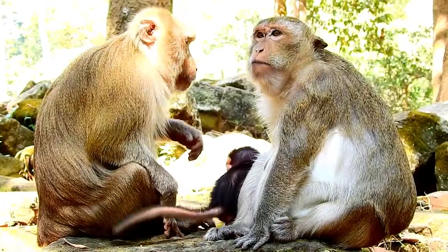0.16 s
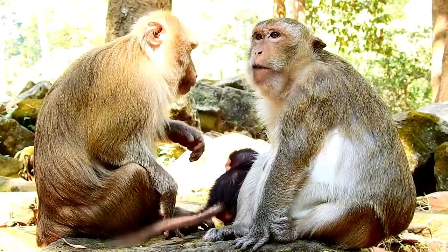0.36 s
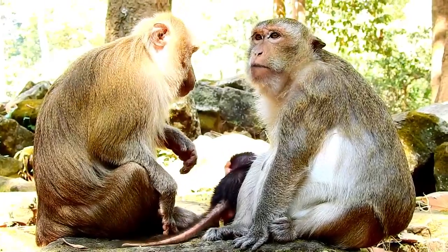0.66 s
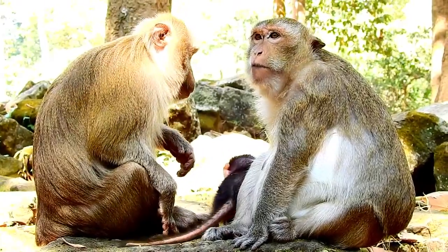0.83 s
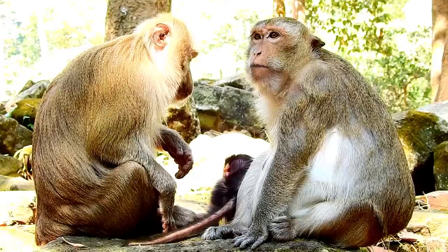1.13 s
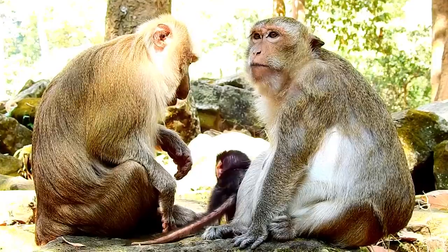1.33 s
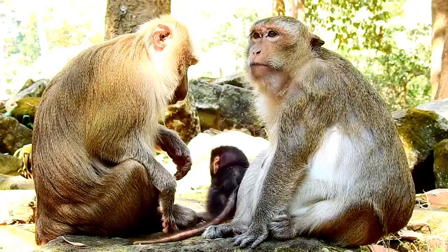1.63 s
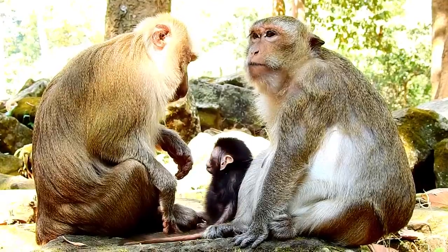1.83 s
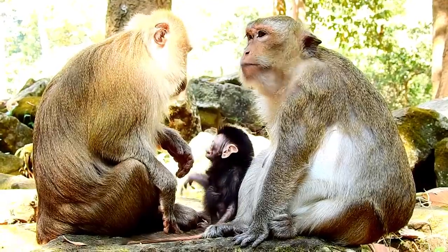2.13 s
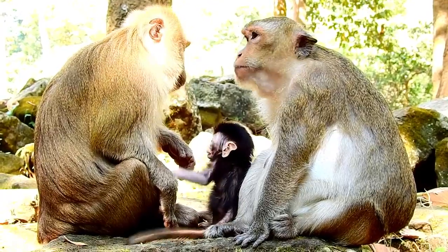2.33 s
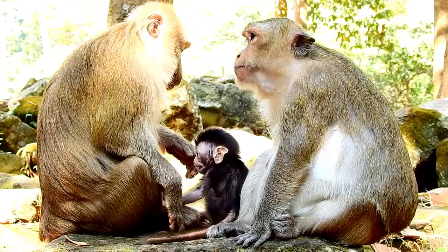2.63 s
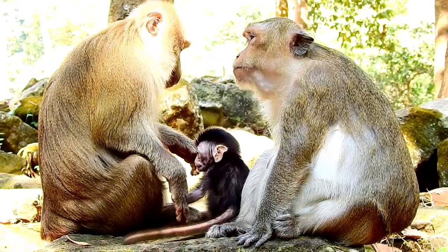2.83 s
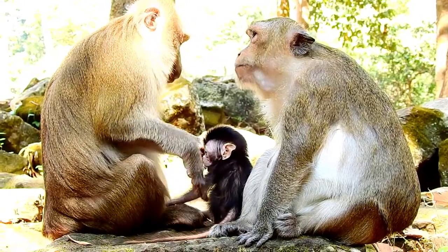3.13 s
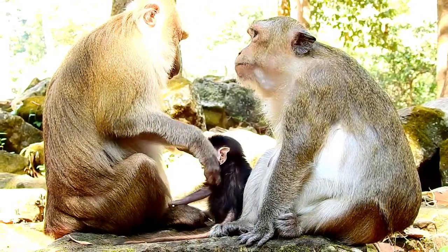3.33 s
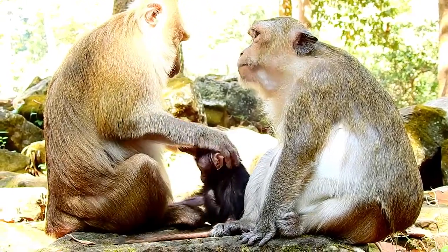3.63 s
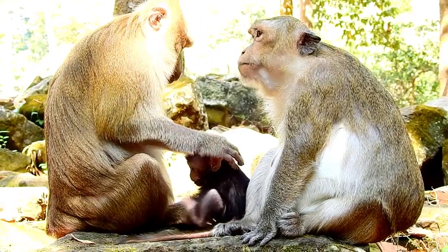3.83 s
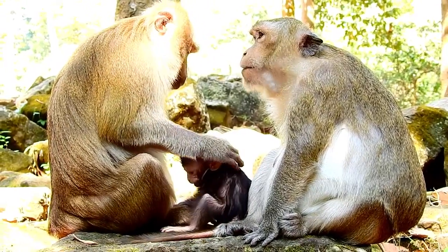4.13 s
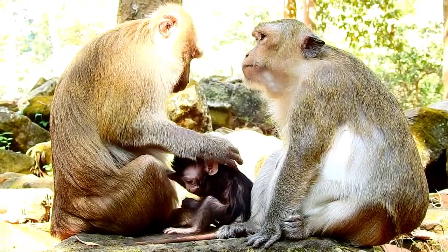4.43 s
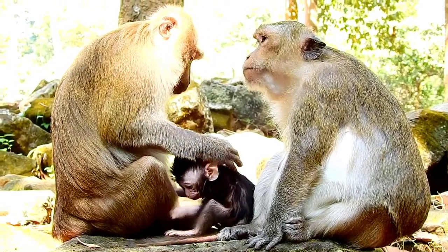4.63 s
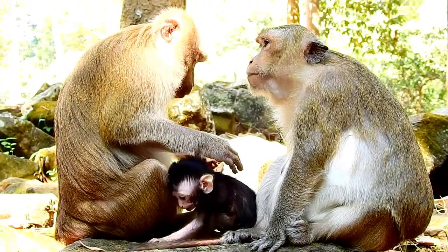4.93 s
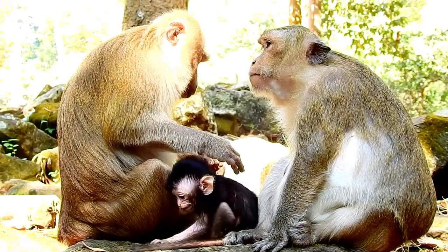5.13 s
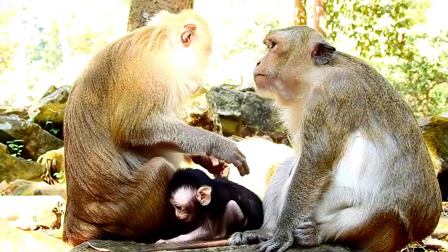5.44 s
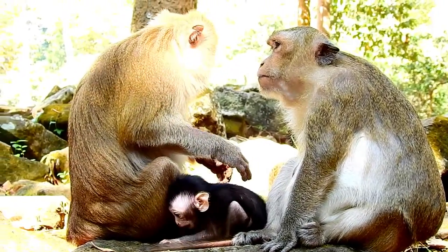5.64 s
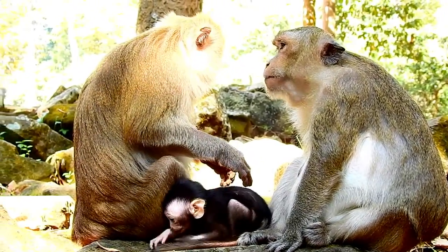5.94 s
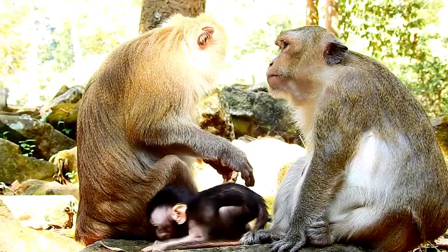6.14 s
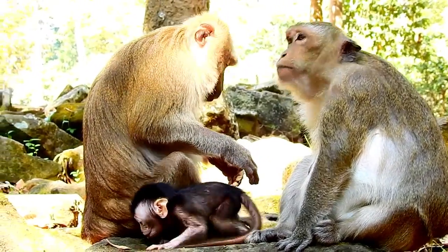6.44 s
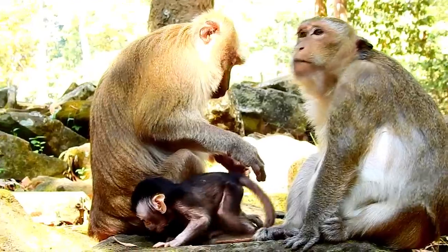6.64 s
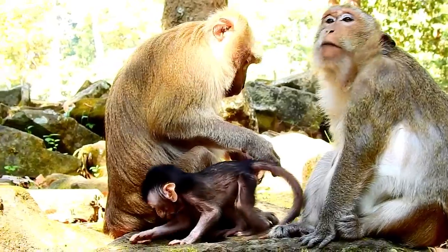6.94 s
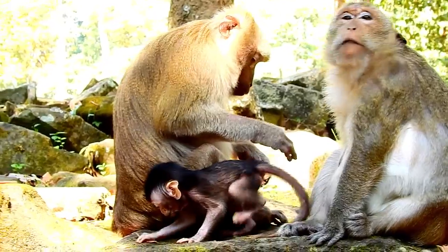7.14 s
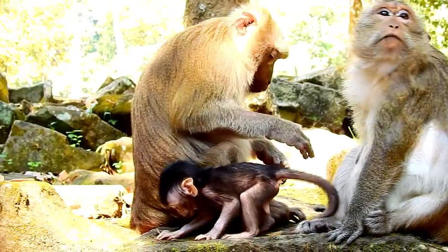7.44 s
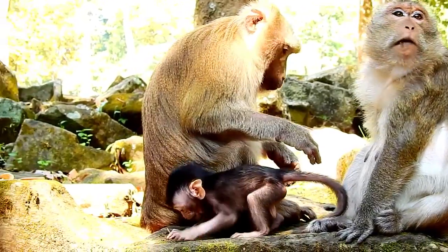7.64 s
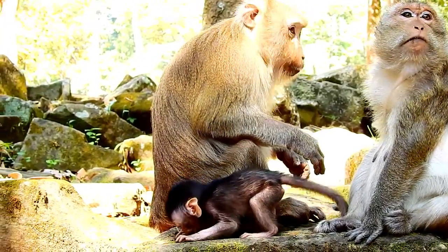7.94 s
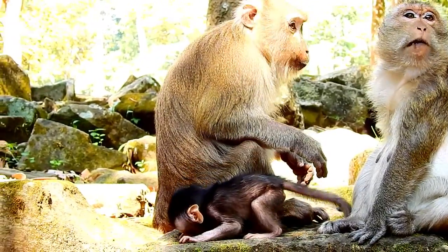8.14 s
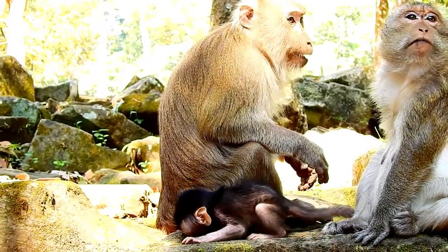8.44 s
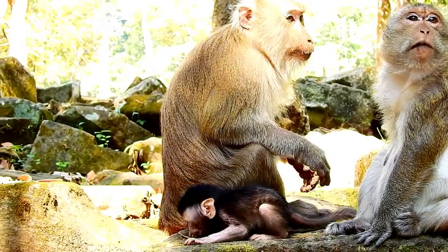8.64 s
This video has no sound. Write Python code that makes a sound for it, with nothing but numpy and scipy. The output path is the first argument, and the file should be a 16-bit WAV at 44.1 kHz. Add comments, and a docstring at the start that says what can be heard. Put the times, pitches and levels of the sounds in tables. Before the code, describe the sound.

In a stony woodland clearing, a far squeal's tail and a leaf stir open over a low drone. A baby monkey squeals clearly nearby, repeating after quiet gaps, while distant animals faintly coo, chirp and whistle. Midway it is calm; then dry leaves scuffle and twigs crack sharply around another squeal. A faint rasp, a distant hoarse cry and a last close squeal over rustling leaves end it. Stereo, with short natural echoes and a presence-heavy small microphone.

```python
"""Among rocks and trees, monkeys call: an infant squeals close by, others squeal, coo and whistle further off.
Voices are stacked harmonics, shaped by throat and mouth, roughened by unsteady pitch and fluttering breath.
Dry leaves rustle as clumped grains, twigs and stone snap and knock as noise bursts, a pulsed noise rasps hoarsely.
Rocks and trunks ring on as decaying scatter; shaped noise makes a far low hum and faint leaf and insect hiss."""
import sys
import numpy as np
from scipy import signal
from scipy.fft import rfft, irfft
from scipy.io import wavfile
from scipy.ndimage import uniform_filter1d

SR = 44100
rng = np.random.default_rng(int(sys.argv[2]) if len(sys.argv) > 2 else 0)


def int16_out(signal):
    """Quantize to a 16-bit WAV file."""
    q = np.round(np.clip(np.atleast_2d(signal).T, -1, 1) * 32767)
    wavfile.write(sys.argv[1], SR, q.astype(np.int16))


N = 386842   # length in samples

# Microphone response: f/Hz, gain/dB
MICROPHONE_RESPONSE = [(28, -4), (60, 0.7), (3600, 0.5), (4000, -3), (4400, 1), (5000, 3), (6400, 6),
                       (8500, -9), (9600, -19.5), (12500, -30.5), (15500, -55)]
CUTOFF_HZ = 15700
# Colour of the far hiss: f/Hz, gain/dB
AIR_COLOUR = [(25, -75.5), (48, -51), (108, 3.5), (170, -13), (253, -19.5), (426, -17.5), (1240, -13),
              (3300, -19), (6400, -22.5), (8500, -18.5), (15500, -12.5)]
AIR_DB = -51.5   # mean of the gusts
# Left-right likeness of the hiss: f/Hz, likeness/1
AIR_LIKENESS = [(60, 1.0), (210, 0.93), (740, 0.951), (2590, 0.61), (9080, 0.067)]
# Bands of the drone: f/Hz, width of each of two resonances in a row/Hz, level in the mix of bands/dB
HUM_BANDS = [(58.6, 75.1, -2), (115.47, 16.8, 1), (161.4, 27.65, 0)]
# Rise and fall of the drone, ahead of an overall trim: t/s, level/dB
HUM_CONTOUR = [(0, -42.5), (.45, -45.5), (1.0, -53), (5.3, -53), (6.6, -49), (7.2, -53.5), (8.77, -52.5)]
# Ring time of the glade: f/Hz, time to fall 60 dB/s
GLADE_RING_TIME = [(500, 0.53), (2900, 0.67), (3400, 0.6425), (6000, 0.536), (12000, 0.2)]

# Colour of the crisp leaf layer: f/Hz, gain/dB
CRISP_COLOUR = [(1500, -48), (2500, -13.5), (4500, -5), (6500, -2.5), (7600, -3.5), (9000, -3.5),
                (15000, 7.5)]
# Colour of the dull leaf layer: f/Hz, gain/dB
DULL_COLOUR = [(200, -18), (500, -7), (900, 5), (1700, 6), (2500, 0), (5000, -79.5)]
# Single stirs in the leaves: t of the peak/s, crisp level/dB, dull level/dB
LEAF_STIRS = [(0.001, -28, -48), (.44, -77, -45), (.55, -38.5, -69), (1.699, -48.5, -83), (2.553, -39, -50),
              (2.778, -37.5, -58), (3.177, -39, -55), (3.702, -40, -65), (7.258, -41, -51),
              (7.6, -40, -52.5), (7.96, -32, -61)]
STIR_RISE_DB_PER_S, STIR_FALL_DB_PER_S = 70, 85
# Two longer scuffles, each a list of: t/s, crisp level/dB, dull level/dB
LEAF_SCUFFLES = [
    [(5.645, -42, -52), (5.67, -35, -55), (5.75, -37, -53), (5.95, -31, -47), (6.12, -25, -40.5),
     (6.25, -23, -41), (6.36, -31, -42), (6.5, -21, -44), (6.59, -25, -46.5), (6.65, -42, -66.5),
     (7.1, -67, -67)],
    [(8.04, -36, -77), (8.08, -33, -70), (8.45, -29, -51.5), (8.62, -31, -54.5), (8.68, -21, -41),
     (8.77, -25, -45)],
]
# Resonances of the rasp: f/Hz, width of the first of two in a row/Hz, level/dB
RASP_RESONANCES = [(1180, 260, -10), (1400, 300, 0), (1650, 280, -8), (2750, 320, -9)]
RASP_S, RASP_DB, RASP_ATTACK_S, RASP_HOLD_S, RASP_FALL_DB_PER_S = 7.45, -36.5, 0.033, 0.14, 96
RASP_PULSES_PER_S = 100   # on average
# Twigs and knocks: t/s, crack peak ahead of panning/dB, knock peak/dB, knock ring f/Hz
TWIG_SNAPS = [(0.3041, -45, -23.5, 521), (0.4116, -50, -24, 600), (1.013, -48, -39.5, 1640),
              (1.1048, -53, -41.5, 900), (1.6885, -34.5, -53, 1090), (2.446, -60, -46.5, 406),
              (2.5675, -45, -29, 1200), (3.1202, -34, -39.5, 1830), (3.1795, -29, -43, 910),
              (3.206, -34, -44, 1220), (3.2683, -35, -45, 1210), (3.342, -38, -43.5, 1670),
              (3.654, -56, -31, 4470), (5.657, -33, -49, 2030), (5.7791, -24.5, -39.5, 860),
              (5.8152, -27, -46, 1070), (5.8474, -30.5, -36.5, 1150), (5.885, -21.5, -32.5, 1510),
              (6.007, -23.5, -37, 1200), (6.051, -24, -25, 3000), (6.0884, -12, -32, 438),
              (6.152, -15, -16, 3640), (6.1801, -20, -19, 2960), (6.212, -30, -27, 2160),
              (6.2588, -20.5, -17.5, 4160), (6.361, -20, -28, 2000), (6.409, -35, -34, 434),
              (6.468, -19, -19.5, 1720), (6.5281, -21.5, -18.5, 2480), (6.578, -34, -43, 1500),
              (6.7392, -33.5, -34.5, 1380), (7.2476, -20, -39.5, 690), (7.5978, -28.5, -28.5, 3020),
              (7.8007, -33, -35, 3500), (7.93, -24, -51, 1830), (8.0571, -21.5, -57, 2150)]

# Gliding whistles, each a list of: t/s, pitch f/Hz, level/dB
WHISTLE_GLIDES = [
    [(.82, 6560, -52), (.89, 5810, -46.5), (.94, 4600, -57.5), (.98, 5300, -51), (1.015, 6024, -41.5),
     (1.07, 7700, -65)],
    [(2.9, 2555, -50), (2.97, 2084, -58.5), (3.03, 1296, -47.5), (3.08, 937.6, -55)],
    [(3.3, 1180, -61), (3.42, 1277, -46.5), (3.5, 1330, -57), (3.53, 1300, -70)],
    [(3.45, 6267, -65), (3.52, 5980, -60), (3.58, 5063, -55.5), (3.7, 4510, -51)],
    [(4.76, 5820, -57.5), (4.93, 6065, -64.5), (5.06, 7123, -63.5)],
]
# Base roughness of each whistle: roughness/1
WHISTLE_ROUGHNESS = (.15, .6, .3, .85, .95)
WHISTLE_ECHO_DB, WHISTLE_SLACK = 2, .5
# Soft coos: the eleven arc columns listed under the infant's squeals,
# then echo relative to direct/dB, brightness/(dB per octave), base roughness/1
COO_CALLS = [ (1.019, 0.0343, 0.32, 0.043, 576, .005, -0.0063, .01, -57.5, 7.5, 5.3, 1, 1.5, 0.34),
             (3.04, 0.048, 0.34, 0.039, 568, 0.015, -0.00031, 0.0104, -59.5, 6, 3.9, 6, 1, 0.544),
             (3.329, 0.083, .16, 0.11, 614, 0.0556, -0.0068, 0.155, -49, -4, 1.6, 8, 12.5, 0.354),
             (6.02, 0.041, 0.049, 0.021, 510.2, .001, -0.06, .05, -44.5, 5.5, 12, -6.5, -39, 0.091), ]
# Throat of the coos: harmonic/1, level/dB
COO_HARMONICS = [(1, -14), (2, 0), (3, -6), (4, -1), (5, -14), (6, -24), (7, -22), (9, -45)]
# Hoarser youngster further off: columns as for the coos
YOUNGSTER_CALLS = [ (-.1, 0.0754, 0.074, 0.062, 915, 0.043, 0.031, 0.054, -30, 35.5, 3.3, 5.7, -3, 0.92),
                   (1.03, 0.0348, .21, 0.086, 781, 0.0299, -0.14, 0.0106, -52, -6, 9.4, 5.6, -5.5, 0.54),
                   (2.48, 0.071, 0.096, 0.08, 923, 0.161, 0.0083, 0.28, -37, 6, 4, 1.08, -4.5, .25),
                   (4.56, 0.13, 0.18, 0.109, 950, 0.1, 0.014, 0.034, -55, 9, 6.6, 5.5, 2, 0.4),
                   (8.141, .1, 0.1362, 0.058, 945.9, 0.17, 0.045, 0.2, -27.5, 7, 1.85, 2.7, 5.5, 0.26), ]
# Throat of the youngster: harmonic/1, level/dB
YOUNGSTER_HARMONICS = [(1, -52), (2, -12), (3, -10.5), (4, 2), (5, -17), (6, -10.5), (7, -13), (8, -16.5),
                       (10, -21), (16, -47)]
YOUNGSTER_PAN_DB, YOUNGSTER_RING_DB = -0.8, 4
# Infant's squeals. Arc: start t/s, rise/s, hold/s, fall/s, pitch f/Hz, starts below/share, sags/share,
# ends below/share, level/dB, fade along the hold/dB, fade along the fall/dB;
# then brightness/(dB per octave), lift of third harmonic/dB, lift of fifth harmonic/dB
INFANT_CALLS = [ (1.861, 0.077, 0.099, 0.11, 839.7, 0.35, 0.014, 0.34, -17.5, 4, 12.8, 0.34, 0, -1),
                (3.891, 0.032, 0.12, 0.108, 850.1, 0.035, 0.0018, 0.26, -25, -2, 3.26, 1.7, 1, 9),
                (6.262, 0.0302, .12, 0.077, 847.2, 0.0454, 0.00802, 0.11, -20.5, 1.5, 3.9, 1.8, 2.5, 0),
                (8.49, 0.048, 0.12, 0.076, 865.3, 0.245, 0.0538, 0.16, -20, 5, 16, 4, 5, 8), ]
# Throat of the infant: harmonic/1, level/dB
SQUEAL_HARMONICS = [(1, -59), (2, -17.5), (3, -7), (4, -0.5), (5, -22.5), (6, -5.5), (7, -12), (8, -14),
                    (9, -14.5), (10, -9.5), (11, -15.5), (16, -20.5)]
INFANT_ECHO_DB, INFANT_PAN_DB, INFANT_RING_DB = -1.81, .8, 2.8
INFANT_ROUGH = .03   # base roughness, 0-1
MOUTH_HZ = 3500
BELOW_BRIGHTENS_DB = 16   # dB per octave gained for each share below the top pitch
ONSET_DB, SLACK_DB_PER_SHARE = 4, 73.5   # level missing at the start; more for each share below pitch
THROAT_SLACK = 2.5   # roughness gained for each share below the top pitch


def from_db(db):
    """Gain of a level in dB."""
    return 10 ** (np.asarray(db) / 20)


def rms_one(x):
    """Scaled to rms 1."""
    return x / np.sqrt(np.mean(x ** 2) + 1e-20)


def panned(x, pan_db):
    """Left and right copies, the left louder by pan_db."""
    return x * from_db(np.array([[.5], [-.5]]) * pan_db)


def at_hz(points, hz):
    """Reads a two-column table on a logarithmic axis of frequency or harmonic order."""
    axis, values = np.transpose(points)
    return np.interp(np.log(hz), np.log(axis), values)


def levels(tables):
    """Smoothed gains over time from tables of (t/s, level/dB, ..), silent outside each table."""
    t, out = np.arange(N) / SR, 0
    for rows in tables:
        s, *columns = np.transpose(rows)
        out = out + np.array([from_db(np.interp(t, s, c, left=-200, right=-200)) for c in columns])
    return uniform_filter1d(out, size=400, mode="nearest")


def drift(rate_hz, size):
    """Slow random wandering of rms 1: white noise through two equal one-pole lowpasses."""
    r, run_in = np.exp(-2 * np.pi * rate_hz / SR), round(SR / rate_hz)
    noise = rng.standard_normal(size + run_in)
    return rms_one(signal.lfilter([1], [1, -2 * r, r * r], noise)[run_in:])


def coloured(x, spectrum):
    """Filters each channel by a table of gains."""
    hz = np.fft.rfftfreq(x.shape[-1], 1 / SR) + 1   # keeps clear of log 0
    return irfft(rfft(x) * from_db(at_hz(spectrum, hz)), x.shape[-1])


def resonate(x, hz, width_hz):
    """One two-pole resonance with a peak gain near 1."""
    r = np.exp(-np.pi * width_hz / SR)
    poles = [1, -2 * r * np.cos(2 * np.pi * hz / SR), r * r]
    return signal.lfilter([(1 - r * r) / 2, 0, (r * r - 1) / 2], poles, x)


def air():
    """Far hiss of leaves and insects: gusting noise, less alike left and right in the treble."""
    mid, side = rfft(rng.standard_normal((2, N)))
    alike = np.clip(at_hz(AIR_LIKENESS, np.fft.rfftfreq(N, 1 / SR) + 1), -1, 1)
    both = irfft(np.sqrt(1 + alike) * mid + np.sqrt(1 - alike) * side * [[1], [-1]], N)
    gusts_db = 1.2 * drift(2, N)
    return from_db(AIR_DB + gusts_db) * rms_one(coloured(both, AIR_COLOUR))


def hum():
    """A far drone: noise through three narrow resonances, which makes each band waver."""
    noise = rng.standard_normal(N)
    bands = 0
    for hz, width, db in HUM_BANDS:
        bands = bands + from_db(db) * rms_one(resonate(resonate(noise, hz, width), hz, width))
    return from_db(-3.0) * levels([HUM_CONTOUR])[0] * rms_one(bands)


def glade(x):
    """Scattering by rocks and trunks: it builds up, then dies band by band, partly alike left and right."""
    t = np.arange(int(1.5 * SR)) / SR
    common, left, right = rng.standard_normal((3, len(t)))
    response = 0
    edges = 300 * 2 ** np.arange(0, 5.9, 1 / 3)   # third octaves
    for low, high in zip(edges, edges[1:]):
        scatter = common + low / 8000 * np.array([left, right])   # treble scatters wider
        band = signal.sosfilt(signal.butter(2, [low, high], "band", fs=SR, output="sos"), scatter)
        response = response + band * from_db(-60 * t / at_hz(GLADE_RING_TIME, np.sqrt(low * high)))
    response = response * (1 - np.exp(-t / 0.0068))
    response = response / np.sqrt(np.sum(response ** 2) / 2)
    response[:, round(.035 * SR)] += from_db([-9, -11])   # one rock face answers on its own
    return signal.fftconvolve(x[None], response, axes=1)[:, :N]


def movement():
    """Crisp and dull gain of the leaves: scuffles, and stirs that swell and die."""
    out, t = levels(LEAF_SCUFFLES), np.arange(N) / SR
    for s, *db in LEAF_STIRS:
        lost_db = np.maximum(STIR_RISE_DB_PER_S * (s - t), STIR_FALL_DB_PER_S * (t - s))
        out = out + from_db(db)[:, None] * from_db(-lost_db)
    return out


def rustle():
    """Leaves crackle as dense uneven grains, each with its own side and colour, over a softer brushing."""
    born = rng.random(N) < 800 * from_db(5.0 * drift(25, N)) / SR   # grains come in clumps
    sizes = from_db(4.2 * np.minimum(rng.exponential(1, N), 3.2)) * born * rng.choice([-1, 1], N)
    side = np.clip(rng.normal(1.0, 1.0, N), -1, 1)
    clicks = sizes * np.array([1 + side, 1 - side])
    dealt = rng.integers(0, 6, N)   # which colour each grain gets
    grains = 0
    for k, hz in enumerate(np.geomspace(500, 12000, 6)):
        ringing = resonate(clicks * (dealt == k) + 1e-18, hz, 0.5 * hz) / np.sqrt(hz)
        grains = grains + ringing * from_db(3 * drift(12, N))   # colours come and go
    brushing = coloured(rng.standard_normal((2, N)), [(500, 9.7), (12000, 1.2)])
    leaves = rms_one(grains) + brushing * from_db(3.5 * drift(20, N) - 3)
    crisp, dull = movement()
    centred = leaves + 1.2 * leaves.mean(axis=0)   # the dull layer sits nearer the middle
    return crisp * rms_one(coloured(leaves, CRISP_COLOUR)) + dull * rms_one(coloured(centred, DULL_COLOUR))


def rasp():
    """A hoarse grunt: uneven rapid pulses, each with a puff of breath, through broad resonances."""
    cycle = np.cumsum(RASP_PULSES_PER_S * (1 + .12 * drift(40, N)) / SR) % 1
    puffs = (.5 + np.exp(-3 * cycle)) * rng.standard_normal(N)
    grit = puffs + 4 * (np.diff(cycle, prepend=0) < 0)   # a click opens each pulse
    ringing = 0
    for hz, width, db in RASP_RESONANCES:
        ringing = ringing + from_db(db) * resonate(resonate(grit, hz, width), hz, 1.3 * width)
    t = np.arange(N) / SR - RASP_S
    fall_db = RASP_FALL_DB_PER_S * np.maximum(t - RASP_HOLD_S, 0)
    shape = np.clip(t / RASP_ATTACK_S, 0, 1) * from_db(RASP_DB - fall_db)
    return shape * rms_one(ringing) * from_db([[-2.0], [1.5]])   # leans right


def snaps():
    """Each snap is a bright noise crack, mostly from the left, and a dull resonant knock in the middle."""
    out, t = np.zeros((2, N)), np.arange(1500) / SR
    for s, crack_db, knock_db, knock_hz in TWIG_SNAPS:
        burst, pan_db = rng.standard_normal(len(t)), rng.normal(2.1, 2.3)
        crack = resonate(burst * np.exp(-t / 0.0071), rng.uniform(7700, 8000), 5100)
        crack = crack + 0.39 * burst * np.exp(-t / 0.00073)   # sharp edge
        knock = resonate(burst * np.exp(-t / 0.0049), knock_hz, 0.37 * knock_hz)
        knock = resonate(knock, knock_hz, 3.4 * knock_hz)
        crack = panned(from_db(crack_db) * crack / np.max(np.abs(crack)), pan_db)
        at = round(s * SR)
        out[:, at:at + len(t)] += crack + from_db(knock_db) * knock / np.max(np.abs(knock))
    return out


def arc(row):
    """Pitch and level of one call as rows of (t/s, f/Hz, level/dB): rise, sagging hold, fall."""
    start, rise, hold, fall, hz, below, sag, drop, db, fade_db, fall_db = row[:11]
    s = np.arange(0, rise + hold + fall, .004)
    to_go, held, gone = np.clip([1 - s / rise, (s - rise) / hold, (s - rise - hold) / fall], 0, 1)
    pitch = hz * (1 - below * to_go ** 1.6 - sag * held - drop * gone ** 1.8)
    swell_db = (ONSET_DB + SLACK_DB_PER_SHARE * below) * to_go ** 1.61
    return np.transpose([start + s, pitch, db - swell_db - fade_db * (held - .5) - fall_db * gone])


def harmonic_gains(orders, pitch, throat, tilt_db, ring_db):
    """Throat weights by harmonic order, tilt and mouth ring by frequency, evened to a steady power."""
    gains = from_db(at_hz(throat, orders) + tilt_db * np.log2(orders / 4))
    gains = gains * (orders * pitch < .45 * SR)   # no aliasing
    gains = gains * from_db(ring_db / (1 + ((orders * pitch - MOUTH_HZ) / 350) ** 2))
    return gains / np.sqrt(np.sum(gains ** 2, axis=0) / 2)


def voices(calls, throat, slack):
    """Folds sound 18 harmonics through throat and mouth; returns direct sound and what goes to the echoes."""
    direct, sent = np.zeros((2, N)), np.zeros(N)
    orders = np.arange(1, 19)[:, None]
    for rows, echo_db, pan_db, tilt_db, ring_db, rough in calls:
        s, *columns = np.transpose(rows)
        at = np.arange(max(round(s[0] * SR), 0), min(round(s[-1] * SR), N))
        pitch, level_db = [np.interp(at / SR, s, c) for c in columns]
        below = 1 - pitch / pitch.max()
        # slackening folds run rough, half as much while the pitch climbs
        rough = np.clip(rough + slack * below * np.where(np.gradient(pitch) > 0, .5, 1), 0, 1)
        unsteady = 1 + .03 * rough * (1 + rough ** 2) * drift(120, len(at))
        phase = 2 * np.pi * np.cumsum(pitch * unsteady) / SR
        gains = harmonic_gains(orders, pitch, throat, tilt_db + BELOW_BRIGHTENS_DB * below, ring_db)
        flicker = from_db([2.2 * drift(18, len(at)) for k in orders])   # the mouth keeps moving
        breath = 1 + 1.1 * rough * drift(200, len(at))   # the air stream flutters
        call = np.sum(gains * flicker * np.sin(orders * phase + orders ** 2), axis=0) * breath
        call = call * from_db(level_db) * signal.windows.tukey(len(at), min(1200 / len(at), 1))
        near = 1 / np.sqrt(1 + from_db(2 * echo_db))   # direct and echo share the power
        direct[:, at] += panned(near * call, pan_db)
        sent[at] += near * from_db(echo_db) * call
    return direct, sent


def whistles():
    """Gliding whistles, from fairly pure to very rough and breathy, with a weak second harmonic."""
    calls = [(rows, WHISTLE_ECHO_DB, 0, 0, 0, rough) for rows, rough in zip(WHISTLE_GLIDES, WHISTLE_ROUGHNESS)]
    return voices(calls, [(1, 0), (2, -40), (3, -80)], WHISTLE_SLACK)


def coos():
    """Soft calls from slack folds, without a mouth ring."""
    calls = [(arc(row), row[-3], 0, row[-2], 0, row[-1]) for row in COO_CALLS]
    return voices(calls, COO_HARMONICS, THROAT_SLACK)


def youngster():
    """Hoarser squeals from rough folds, with the mouth ringing."""
    calls = [(arc(row), row[-3], YOUNGSTER_PAN_DB, row[-2], YOUNGSTER_RING_DB, row[-1])
             for row in YOUNGSTER_CALLS]
    return voices(calls, YOUNGSTER_HARMONICS, THROAT_SLACK)


def infant():
    """Close squeals, each with its own lift of the third and fifth harmonics."""
    squeals = []
    for row in INFANT_CALLS:
        tilt_db, third_db, fifth_db = row[-3:]
        lift_db = {3: third_db, 5: fifth_db}
        throat = [(k, db + lift_db.get(k, 0)) for k, db in SQUEAL_HARMONICS]
        call = (arc(row), INFANT_ECHO_DB, INFANT_PAN_DB, tilt_db, INFANT_RING_DB, INFANT_ROUGH)
        squeals.append(voices([call], throat, THROAT_SLACK))
    return squeals


def scene():
    """All sources, with calls, snaps and rasp echoing in the glade."""
    ground = snaps() + rasp()
    calls = [whistles(), coos(), youngster(), *infant()]
    sent = sum(echo for direct, echo in calls) + from_db(-3.5) * ground.mean(axis=0)
    return air() + hum() + glade(sent) + rustle() + ground + sum(direct for direct, echo in calls)


def record(dry):
    """The small microphone peaks in the presence range and loses the top, with a steep final cutoff."""
    lowpass = signal.cheby2(12, 70, CUTOFF_HZ, fs=SR, output="sos")
    return signal.sosfilt(lowpass, coloured(dry, MICROPHONE_RESPONSE))


dry = scene()
out = record(dry)
int16_out(out)
```